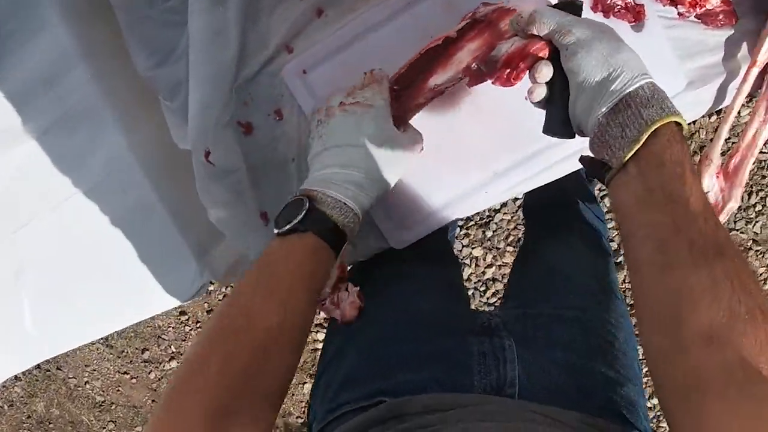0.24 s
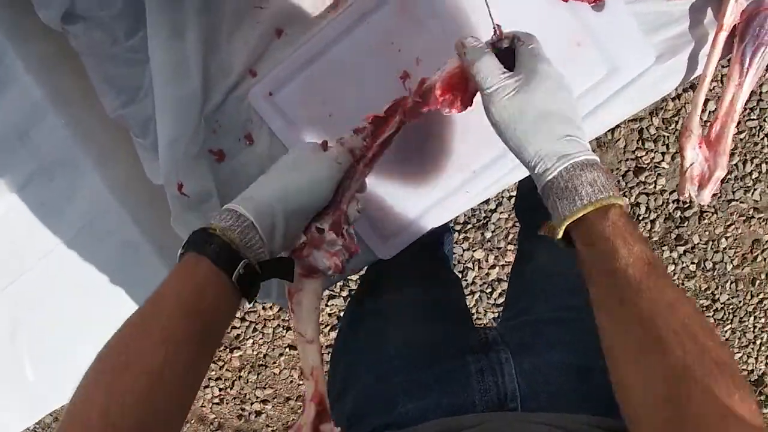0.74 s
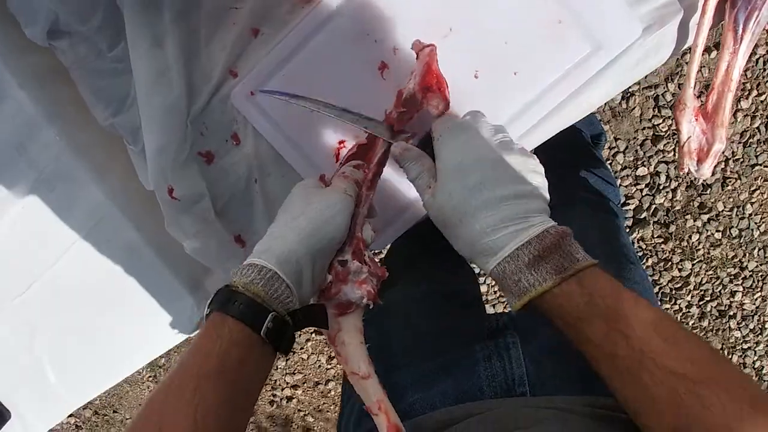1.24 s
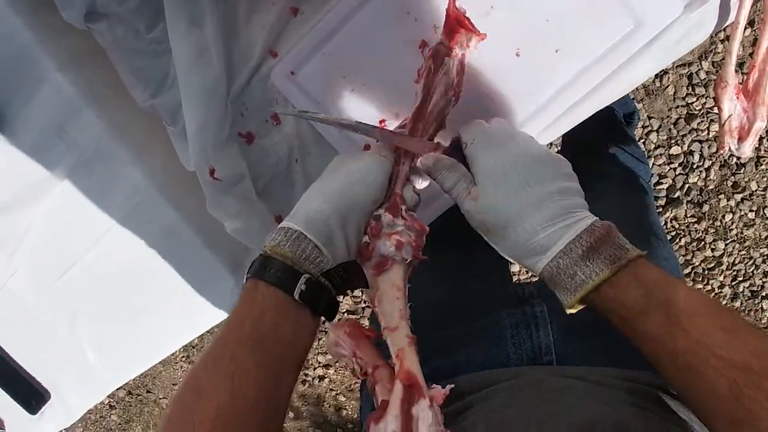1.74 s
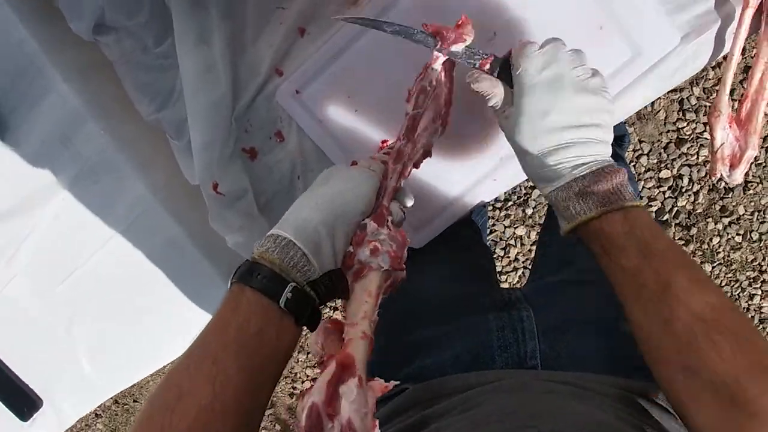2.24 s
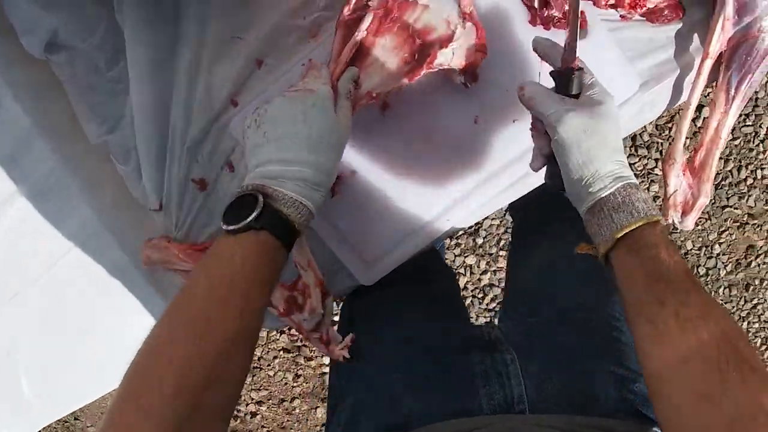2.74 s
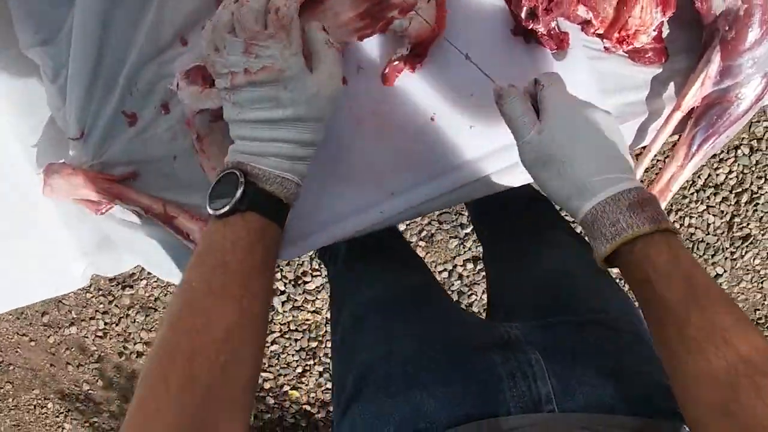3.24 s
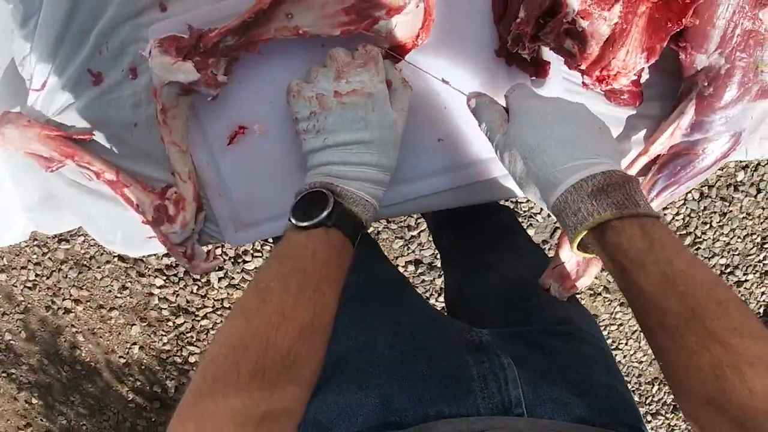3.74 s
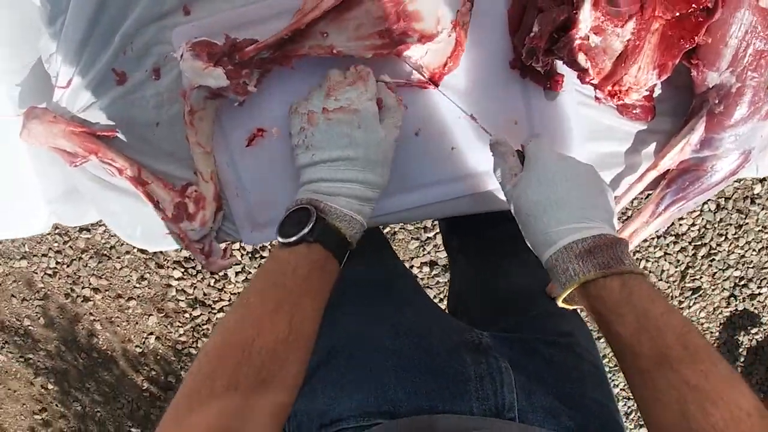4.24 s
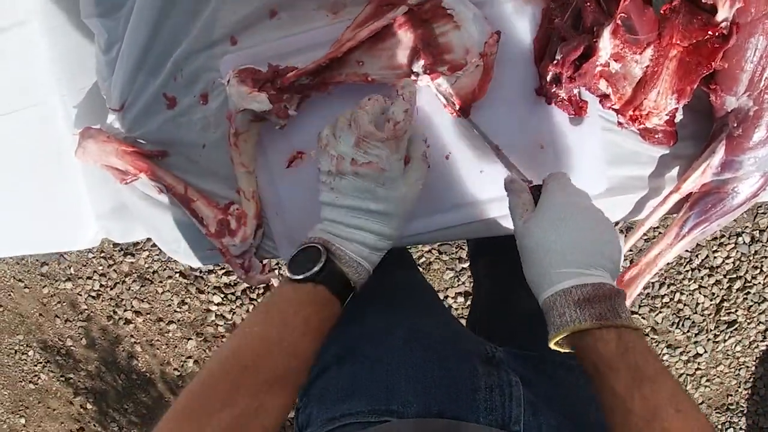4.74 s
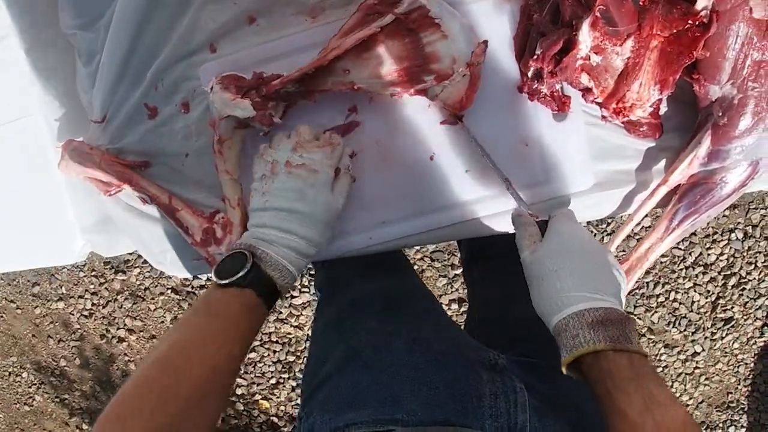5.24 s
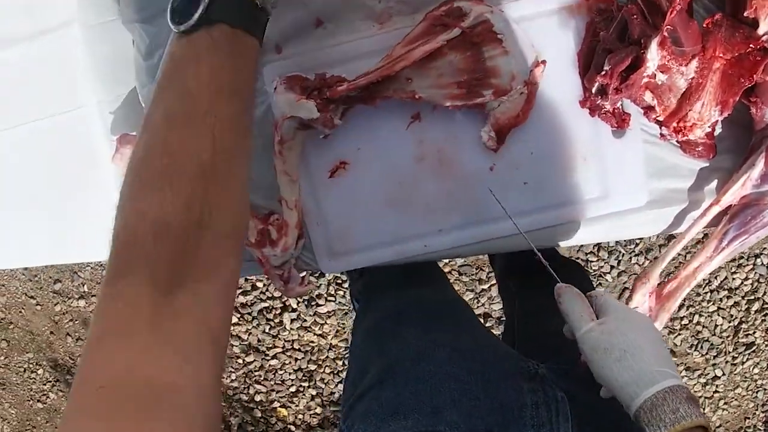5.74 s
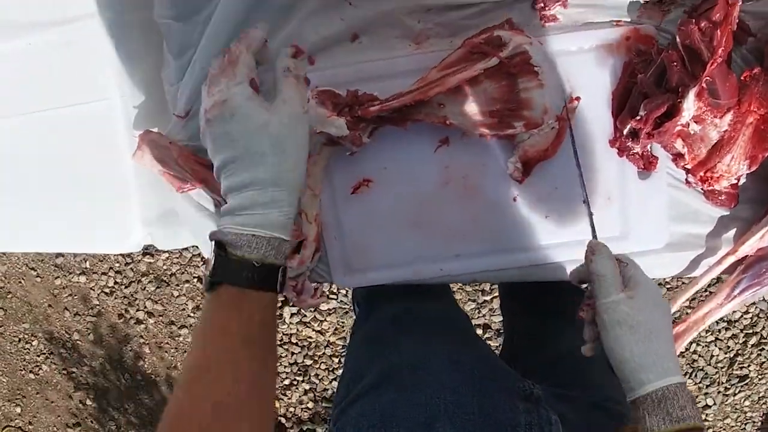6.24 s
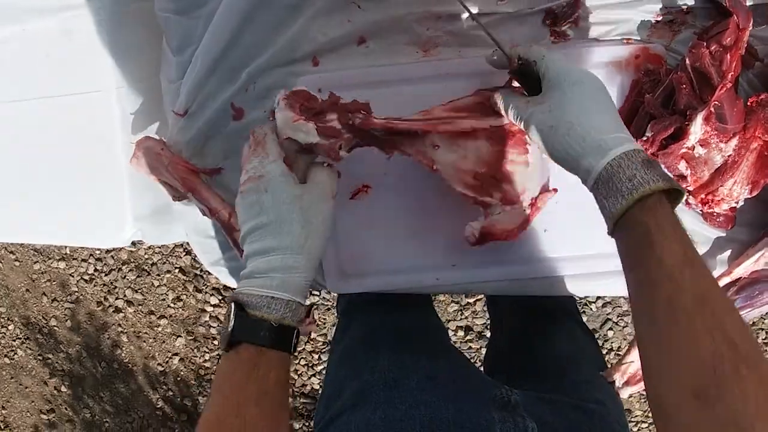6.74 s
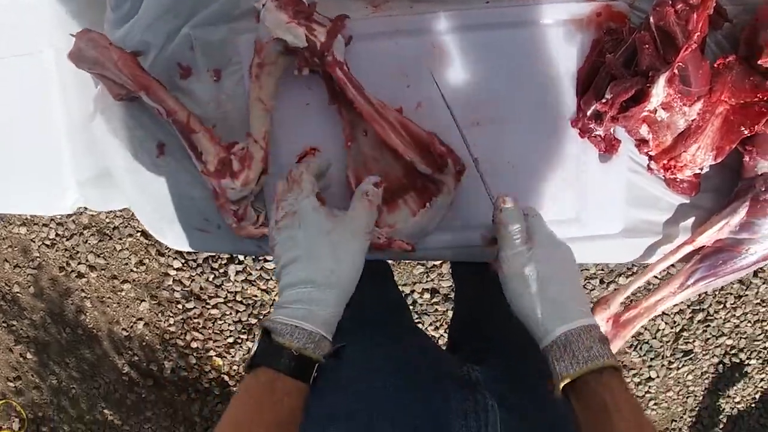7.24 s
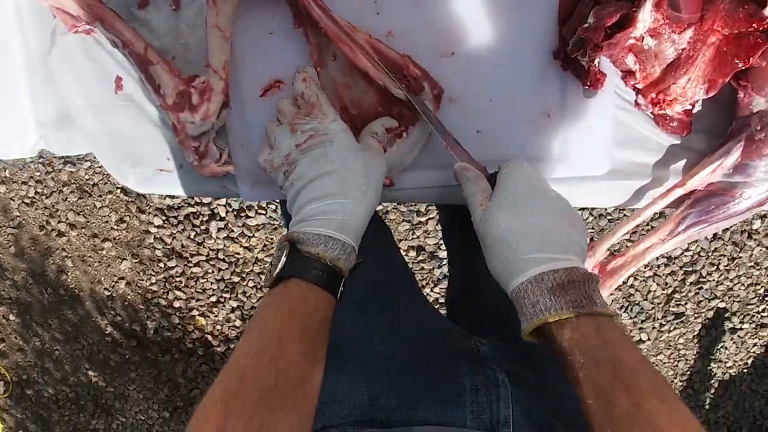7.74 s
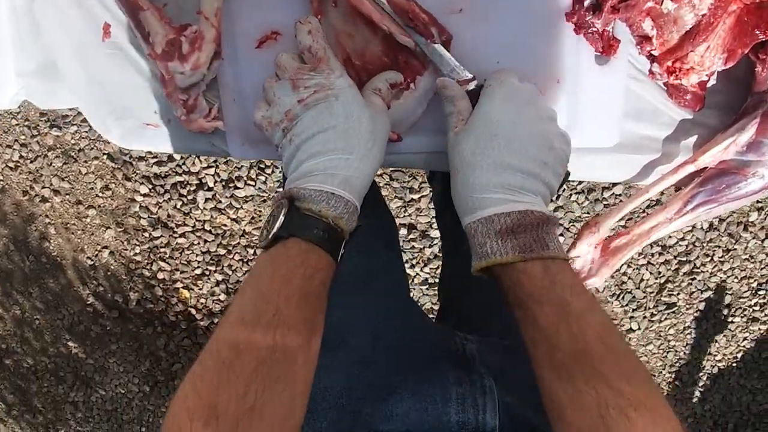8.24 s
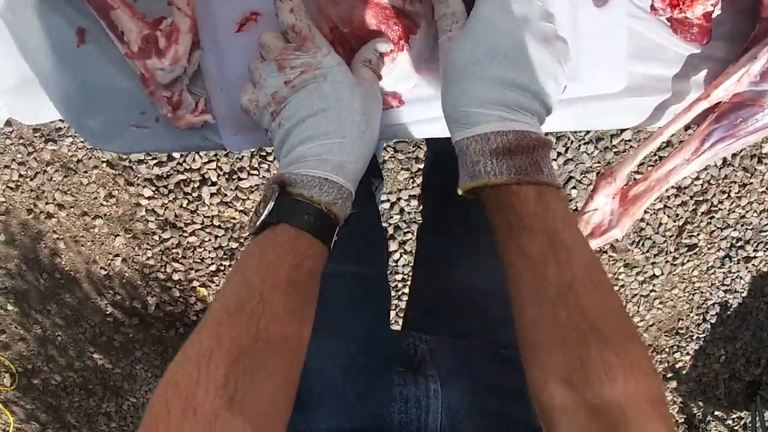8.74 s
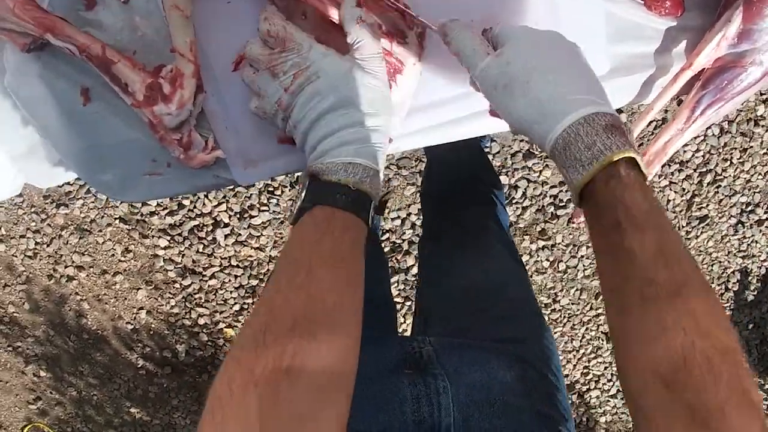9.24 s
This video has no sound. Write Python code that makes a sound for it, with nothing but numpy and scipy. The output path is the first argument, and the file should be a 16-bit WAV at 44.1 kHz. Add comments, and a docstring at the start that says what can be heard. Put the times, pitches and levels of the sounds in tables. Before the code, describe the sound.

Dull, meat-damped thuds open the scene on a hollow plastic board, followed by sparse blade scratches and glove friction. Another bump comes before three seconds, and a soft low drone swells briefly. Tiny double ticks run on. Swishing leads to a strong thump at seven seconds, then ticks grow clearer, with a short squeak. The dry, close microphone catches low air puffs and quiet outdoor air.

```python
"""A leg bone thuds and clatters onto a plastic cutting board, on a cloth-covered table outdoors.
Landings ring the board's modes; knife taps are bursts of micro-contacts through resonances and filters.
Small paired ticks are snaps with a fizz; gloves and meat slide as gritty noise with tiny wet pops.
Narrow noise bands ring briefly; a low drone swells early on, and a separate short squeak comes near the end.
Behind it all lie open air and a faint low drone in filtered noise, with puffs on the microphone."""
import sys
import numpy as np
from scipy import signal
from scipy.fft import rfft, irfft
from scipy.io import wavfile

SR = 44100
rng = np.random.default_rng(int(sys.argv[2]) if len(sys.argv) > 2 else 0)


def to_wav(s):
    """Save 16-bit WAV."""
    ch = np.atleast_2d(s).T  # columns
    pcm = np.round(np.clip(ch, -1, 1) * 32767)  # PCM
    wavfile.write(sys.argv[1], SR, pcm.astype(np.int16))


N = 419118
TIME = np.arange(N) / SR  # s
AGE = TIME[:SR // 3]  # s since a contact began


def from_db(db):
    """Turn a level in dB into an amplitude."""
    return 10 ** (np.asarray(db) / 20)


def rms_one(x):
    """Scale a steady sound to rms 1."""
    return x / np.sqrt(np.mean(x ** 2) + 1e-20)


def burst_one(x):
    """Scale a burst to the energy of 10 ms at rms 1."""
    return x / np.sqrt(np.sum(x ** 2) / (SR / 100) + 1e-20)


def dying(t60):
    """Exponential decay that falls 60 dB in t60 seconds."""
    return from_db(-60 * AGE / max(t60, 1e-3))


def bell(centre_s, length_s):
    """A smooth swell in level, down to 1/e at half its length on either side of the centre."""
    return np.exp(-(2 * (TIME - centre_s) / length_s) ** 2)


def add(out, s, sound):
    """Mix a sound in at a time in seconds."""
    start = max(round(s * SR), 0)
    out[start:start + len(sound)] += sound[:N - start]


def low_pass(x, hz, order=2):
    """Soften everything above a cut-off."""
    return signal.sosfilt(signal.butter(order, min(hz, SR / 3), fs=SR, output="sos"), x)


def resonance(x, hz, width_hz):
    """One broad or narrow peak, gain about 1 on top."""
    r = np.exp(-np.pi * width_hz / SR)
    feed = np.array([1, 0, -1]) * (1 - r * r) / 2
    feedback = [1, -2 * r * np.cos(2 * np.pi * hz / SR), r * r]
    return signal.lfilter(feed, feedback, x)


def colour(x, spectrum, size=4096):
    """Causal (minimum-phase) filter with the given spectrum; white noise keeps its power."""
    hz, db = np.transpose(spectrum)
    grid = np.log(np.maximum(np.fft.rfftfreq(size, 1 / SR), 1))
    # beyond either end of the table the level falls by 12 dB per octave
    outside = np.maximum(np.log(hz[0]) - grid, 0) + np.maximum(grid - np.log(hz[-1]), 0)
    log_gain = np.log(from_db(np.interp(grid, np.log(hz), db))) - 2 * outside
    # folding the cepstrum forward gives the minimum phase
    cepstrum = irfft(log_gain)
    cepstrum[1:size // 2] *= 2
    cepstrum[size // 2 + 1:] = 0
    response = irfft(np.exp(rfft(cepstrum)))
    return signal.oaconvolve(x, response / np.linalg.norm(response))[:len(x)]


def drift(rate):
    """Chance wandering: random knots of spread 1, so many per second, joined by straight lines."""
    knots = rng.standard_normal(N // 20)
    return np.interp(TIME * rate, np.arange(len(knots)), knots)


def grit(size, spread_db):
    """Countless tiny slips of uneven strength."""
    strength = from_db(spread_db * np.minimum(rng.exponential(1, size), 4))
    return rms_one(rng.standard_normal(size) * strength)


def contact(t60, tail_db, tail_t60, spread_db, rise_s=0.00043):
    """A short crunch of micro-contacts with a faint after-ring."""
    press = 1 - np.exp(-AGE / max(rise_s, 1e-5))
    decay = dying(t60) + from_db(tail_db) * dying(tail_t60)
    return burst_one(grit(len(AGE), spread_db) * press * decay)


def knocks(place_db=6.5, board_db=-9.5, loose_db=-10.5, bone_db=-25.0, low_cut_hz=50, meat_loss=0.032):
    """Each landing sets the board ringing; flesh softens the blow, bare bone chatters and rings."""
    # Bone and meat landing on the board. Each row: start in seconds, blow in dB, contact cut-off in Hz,
    # place on the board 0-1, ring time factor, clatter in dB.
    landings = [(.001, -6, 215, 0.3, 0.23, -29), (.039, 2, 306, 0.53, 0.19, -27),
                (.049, -7, 240, 0.15, 1.48, -23), (.063, -19.5, 200, 0.55, 1.3, -27),
                (2.782, -11, 485, 0.18, 0.81, -37), (2.798, -16, 377, .36, 1, -29.5),
                (2.884, -3.5, 125, 0.55, 0.78, -41), (4.12, -33.5, 150, 0.2, 0.74, -69),
                (5.039, -18.5, 140, 0.57, 0.54, -60), (7.009, -4.5, 382, .76, 0.84, -20),
                (7.025, -13.5, 420, 0.42, 0.86, -31.5), (7.053, -14.5, 303, 0.57, 1.84, -48),
                (7.083, 1.5, 314, 0.2, 0.44, -17), (7.785, -41, 400, .5, 0.99, -50),
                (7.822, -30, 240, 0.28, 0.62, -45), (8.128, -41, 237, 0.56, 1.8, -50),
                (8.545, -37, 151, 0.56, 1.1, -73), (8.745, -22, 240, 0.2, 1.15, -39),
                (8.842, -38, 250, 0.35, 0.6, -49.5)]
    # Board and table top. Each row: mode in Hz, relative level in dB, t60 in seconds of the board
    # before the ring time factor and the loss to the meat.
    board_modes = [(63, 0.5, 0.088), (78, -11.5, 0.31), (96.5, -1, 0.23), (131.5, 0.5, 0.23),
                   (158.5, 1.5, 0.35), (177, 8, 0.13), (221, -11.5, 0.39), (277, 0.5, 0.096),
                   (327.4, -7, 0.39), (356, -1, 0.14), (412.8, 3.5, 0.077), (538, 0.5, 0.13),
                   (618, -19, 0.17), (690, -13, 0.17), (769, -14.5, 0.41), (810, 3.5, 0.12),
                   (858, -6, 0.57), (1010, -4.5, 0.086)]
    # Hard bone chattering on the plastic. Each row: frequency in Hz, relative level in dB per Hz.
    clatter_colour = [(250, -7.5), (500, 7.5), (850, 8.5), (1150, -4), (1450, 5), (1950, 0), (2500, -9),
                      (4000, -12.5), (6500, -15), (9000, -36.5), (14000, -68.5)]
    # Ringing of the bare bone and blade. Each row: frequency in Hz, relative level in dB, t60 in seconds.
    bone_modes = [(1007, -1, .25), (1380, -6, 0.46), (1350, -5, 0.38), (1745, 0, 0.17), (1900, -7, 0.21),
                  (2050, -5.5, 0.11), (2260, -4.5, 0.26)]

    thuds, chatter, rings = np.zeros(N), np.zeros(N), np.zeros(N)
    hz, mode_db, t60 = np.transpose(board_modes)
    k = np.arange(len(board_modes))
    swing = np.sin(2 * np.pi * np.outer(hz, AGE))
    bone = sum(from_db(db) * np.sin(2 * np.pi * f * AGE) * dying(t) for f, db, t in bone_modes)
    for s, db, contact_hz, place, ring_time, clatter_db in landings:
        # each mode is strongest at its own places; neighbours swing against each other
        strength = (-1) ** k * from_db(board_db + mode_db + place_db * np.cos(np.pi * (k + 1) * place))
        # meat lying on the board takes a share of every cycle, so high modes lose more to it
        decay_per_s = np.log(1000) / (t60 * ring_time) + meat_loss * hz
        ring = strength @ (swing * np.exp(-np.outer(decay_per_s, AGE)))
        # loose flesh slaps down around the bone
        loose = burst_one(resonance(contact(0.13, -19.0, 0.4, 1.8), 300, 400))
        add(thuds, s, from_db(db) * low_pass(ring + from_db(loose_db) * loose, contact_hz))
        add(chatter, s, from_db(clatter_db) * contact(0.082, -27.5, 0.15, 3.6))
        add(rings, s, from_db(clatter_db + bone_db) * bone)
    high_pass = signal.butter(2, low_cut_hz, "high", fs=SR, output="sos")
    thuds = signal.sosfilt(high_pass, thuds + 1e-18)
    return thuds + rings + colour(chatter, clatter_colour)


def taps(body_width=0.41, skirt_width=1.0, crack_db=-4.5, rise_s=0.00082, top_hz=7500):
    """The touched spot answers with a resonance and a broad crack, the edge snicks, the handle tocks."""
    # Knife taps, and the low bodies of some landings. Each row: start in seconds, body in dB,
    # body pitch in Hz, steel edge in dB, t60 in seconds of the crunch at the touched spot.
    touches = [(0.039, -21, 446, -47, 0.018), (0.168, -59, 3000, -53, 0.017), (0.315, -55, 3500, -59, .018),
               (0.611, -46.5, 2550, -51.5, 0.018), (0.664, -44, 3040, -54, 0.011),
               (0.744, -63, 2860, -49, 0.027), (0.747, -46.5, 2240, -37.5, 0.027),
               (1.061, -58, 3000, -72, .012), (1.437, -45.5, 1940, -49.5, .04),
               (1.546, -45, 1660, -49, 0.03), (1.916, -30.5, 1100, -36, .031),
               (1.938, -37, 1190, -38.5, 0.087), (2.178, -60, 2230, -65, 0.0095),
               (2.265, -43.5, 1400, -46, 0.014), (2.386, -51.5, 3920, -78, 0.01),
               (2.631, -61, 3620, -54, 0.018), (2.783, -26.5, 457, -59, 0.13),
               (3.146, -39, 1520, -48, 0.046), (3.175, -48.5, 2090, -50, 0.037),
               (3.205, -43.5, 3250, -62, 0.02), (4.04, -51.5, 1180, -59.5, 0.077),
               (4.12, -45.5, 1000, -64, 0.027), (4.353, -51.5, 1340, -73, 0.063),
               (4.522, -55, 1400, -80, 0.032), (4.778, -45, 2980, -55, 0.016),
               (5.424, -48, 840, -77, 0.036), (5.61, -48.5, 1240, -58, 0.11), (5.819, -57, 2820, -56, .017),
               (5.993, -56, 2300, -47.5, 0.018), (6.38, -68, 3500, -56.5, 0.016),
               (6.439, -40.5, 2960, -48, 0.018), (6.689, -48.5, 3080, -68, 0.013),
               (6.721, -47, 1290, -65, 0.014), (7.056, -32.5, 400, -26.5, .023),
               (7.082, -17.5, 1650, -55, 0.018), (7.555, -53, 1306, -88, .019),
               (7.776, -53.5, 1490, -64, 0.01), (7.788, -42, 1520, -74, 0.015),
               (7.82, -38, 1450, -76, .0083), (8.127, -47.5, 1040, -47.5, 0.015),
               (8.687, -47.5, 2750, -49, .021), (8.725, -42, 820, -54, 0.024),
               (8.743, -32.5, 3500, -31, 0.018), (8.757, -36.5, 2000, -56, 0.018),
               (8.922, -54.5, 2560, -52, .02), (8.956, -55, 1700, -55, 0.014)]
    # Colour of the steel edge. Each row: frequency in Hz, relative level in dB per Hz.
    edge_colour = [(2000, -10.5), (3500, 0.5), (5000, 5.5), (6700, 9), (8200, 2.5), (9200, -5.5),
                   (11000, -11.5), (15000, -33)]
    # the tock relative to the body of a 1 kHz tap, and its loss as the touch gets higher and lighter
    tock_db, tock_loss_db_per_octave = -4.5, 5.5

    body, edge = np.zeros(N), np.zeros(N)
    for s, body_db, body_hz, edge_db, t60 in [*touches, *stray_touches()]:
        handle_db = body_db + tock_db - tock_loss_db_per_octave * np.log2(body_hz / 1000)
        crunch = contact(t60, -32.5, 0.074, 4.2, rise_s)
        spot = resonance(crunch, body_hz, body_hz * body_width)
        spot = resonance(spot, body_hz, body_hz * skirt_width)
        crack = resonance(contact(t60, -29.5, 0.11, 4.6, rise_s), 2800, 1800)
        add(body, s, from_db(body_db) * burst_one(spot))
        # the crack needs both a firm touch and a bare edge
        add(body, s, from_db((body_db + edge_db) / 2 + crack_db) * burst_one(crack))
        handle = low_pass(resonance(contact(t60 * 0.68, -19.0, 0.16, 3.6, rise_s), 350, 450), 950)
        add(body, s, from_db(handle_db) * burst_one(handle))
        add(edge, s, from_db(edge_db) * contact(t60 * 1.1, -33.0, 0.25, 8.9, rise_s))
    return low_pass(body, top_hz) + colour(edge, edge_colour)


def stray_touches(count=12):
    """Light touches at random moments, as rows like those of the taps."""
    middle_db, spread_db, edge_db = -63, 3.5, -6  # the edge is relative to the body
    low_hz, high_hz, t60_s = 1300, 3930, 0.048
    when, pitch, force = rng.random((count, 3)).T
    db = middle_db + spread_db * (2 * force - 1)
    hz = low_hz * (high_hz / low_hz) ** pitch
    return list(zip(when * N / SR, db, hz, db + edge_db, np.full(count, t60_s)))


def sliding(drag_db=-1.0, swish_db=-4.5, reach_octaves=1.0, judder_db=3.0,
            crackle_db=-8.0, crackle_limit_db=-45.5):
    """Friction excites resonances near the pitch of the stroke; glove swish and wet crackle lie on top."""
    # Resonances that the drag excites. Each row: frequency in Hz, width in Hz, relative level in dB.
    drag_modes = [(420, 460, 5), (620, 460, 4.5), (820, 510, 2), (1108, 640, 0.5), (1450, 330, -0.5),
                  (1720, 270, -5), (2040, 1100, -1.5), (2940, 790, 1)]
    # Colour of the swish. Each row: frequency in Hz, relative level in dB per Hz.
    swish_colour = [(1800, -7), (3200, -0.5), (4800, -1.5), (6600, -2), (8000, -11.5), (9200, -17),
                    (11000, -22), (13000, -34), (15500, -45.5)]

    drag_level, drag_hz, swish_level = rubbing()
    slips, octave = [grit(N, 6.2), grit(N, 5.8)], np.log2(drag_hz)
    drag, power = np.zeros(N), 1e-9
    for k, (hz, width_hz, db) in enumerate(drag_modes):
        weight = from_db(db) * np.exp(-((np.log2(hz) - octave) / reach_octaves) ** 2 / 2)
        drag += weight * rms_one(resonance(resonance(slips[k % 2], hz, width_hz), hz, hz))
        power = power + weight ** 2
    drag *= from_db(drag_level + drag_db) / np.sqrt(power)
    swish = from_db(swish_level + swish_db) * colour(grit(N, 1.2), swish_colour)
    # pops stay small however fast the meat slides
    wet_level = np.minimum(swish_level, crackle_limit_db) + crackle_db
    wet = from_db(wet_level) * crackles(51, 1680, 6130, 0.18)
    return (drag + swish) * from_db(judder_db * drift(90)) + wet


def rubbing():
    """Holding and strokes add in power, which weighs their pitches; gives drag dB, drag Hz, swish dB."""
    # Gloves holding the meat and rubbing lightly. Each row: time in seconds, drag in dB before
    # the trim in sliding().
    holding = [(0, -54), (1.0, -61.5), (1.25, -67.5), (2.4, -62.5), (3.5, -68), (4.2, -63), (5.55, -65.5),
               (5.7, -60), (6.15, -67.5), (6.6, -59.5), (7.6, -73.5), (8.0, -64.5), (8.35, -59.5),
               (9.0, -59.5), (9.5, -68)]
    # Strokes of knife, gloves and meat. Each row: start in seconds, length in seconds, drag in dB,
    # drag centre in Hz, bright swish in dB; both levels before the trims in sliding().
    strokes = [(0.028, 0.095, -41.5, 1000, -54), (0.231, 0.61, -61.5, 1150, -57.5),
               (0.805, .2, -61, 825, -67), (1.33, 0.043, -54.5, 920, -67), (1.422, 0.03, -47, 1520, -47),
               (1.876, 0.063, -57, 1340, -58), (1.939, 0.021, -48, 1110, -55),
               (2.108, 0.043, -56, 690, -77), (2.269, 0.019, -45.5, 930, -52),
               (2.71, 0.091, -46.5, 925, -44.5), (2.749, 0.079, -55, 570, -32), (2.788, .13, -44, 650, -47),
               (2.954, 0.18, -51, 1250, -53), (3.113, .18, -62, 1500, -56),
               (4.074, 0.077, -53.5, 1750, -51.5), (4.372, 0.063, -64, 2500, -55.5),
               (4.68, .1, -62, 1450, -56.5), (4.79, .1, -54, 1700, -55.5), (5.017, 0.027, -57, 620, -54.5),
               (5.143, 0.23, -63, 890, -62.5), (5.41, 0.039, -56, 800, -62), (5.6, 0.096, -62, 1200, -56.5),
               (5.914, 0.098, -57, 1340, -55.5), (6.425, 0.038, -56, 1300, -51),
               (6.589, 0.14, -55.5, 2000, -47.5), (6.721, 0.087, -43, 2100, -39),
               (6.8, 0.096, -52, 2230, -45), (6.86, 0.12, -46.5, 2100, -42), (6.975, 0.13, -36.5, 850, -35),
               (7.085, 0.21, -56.5, 907, -64), (8.225, 0.078, -54, 1980, -57),
               (8.39, 0.092, -48.5, 930, -53), (8.523, 0.14, -53.5, 1860, -47),
               (8.676, 0.13, -51.5, 1000, -63), (8.935, 0.048, -48.5, 1270, -50),
               (9.091, 0.053, -56, 1300, -75)]
    holding_hz, holding_swish_db = 1000, -1.5  # swish relative to the drag
    # a stroke presses in over a share of its length, eases off by some dB to its end, and dies away
    attack_share, ease_db, release_t60_s = 0.56, 4, 0.14

    drag = from_db(np.interp(TIME, *np.transpose(holding))) ** 2
    swish = drag * from_db(holding_swish_db) ** 2
    log_hz = drag * np.log(holding_hz)
    for s, length, drag_db, hz, swish_db in strokes:
        age = np.arange(int((length + release_t60_s) * SR)) / SR
        attack = np.sin(np.pi / 2 * np.minimum(age / (attack_share * length), 1))
        ease = from_db(ease_db * (.5 - np.minimum(age / length, 1)))
        release = np.exp(-np.log(1000) * np.maximum(age - length, 0) / release_t60_s)
        press = attack * ease * release
        power = (from_db(drag_db) * press) ** 2
        add(drag, s, power)
        add(log_hz, s, power * np.log(hz))
        add(swish, s, (from_db(swish_db) * press) ** 2)
    return 10 * np.log10(drag), np.exp(log_hz / drag), 10 * np.log10(swish)


def crackles(per_s, low_hz, high_hz, width, count=10):
    """Wet tissue parts in tiny pops, each dealt one of a few pitches and given a soft top."""
    happens = rng.random(N) < per_s / SR
    sign = rng.choice([-1, 1], N)
    pops = happens * sign * from_db(4 * np.minimum(rng.exponential(1, N), 2.5))
    dealt = rng.integers(0, count, N)
    rings = np.zeros(N)
    for k, hz in enumerate(np.geomspace(low_hz, high_hz, count)):
        rings += resonance(pops * (dealt == k) + 1e-18, hz, hz * width) / np.sqrt(hz)
    return rms_one(low_pass(rings, 7000, order=4))


def ticks(pair_gap=.022, repeat_gap=0.0018, snap_db=-9.0, fizz_db=-3.0, second_db=0.1):
    """Small ticks in pairs, 22 ms apart; each is a snap, repeated once at once, with a brief fizz."""
    # Ticks that come in pairs. Each row: start of the first tick in seconds, level in dB
    # that snap and fizz are set against.
    pairs = [(0.147, -72), (1.661, -64.5), (3.418, -61.5), (3.575, -55.5), (3.744, -52.5), (3.912, -54),
             (4.087, -52.5), (4.233, -52), (4.566, -55), (4.702, -51), (5.147, -57), (5.296, -56),
             (5.45, -57), (7.252, -61), (7.446, -56.5), (7.629, -58.5), (7.855, -51), (8.069, -48.5),
             (8.269, -41.5), (8.467, -43), (8.817, -39.5), (9.092, -34.5), (9.288, -37)]
    # Colour of the ticks. Each row: frequency in Hz, relative level in dB per Hz.
    tick_colour = [(1000, -20.5), (2200, -10.5), (3800, -3.5), (5800, 0), (6800, -0.5), (8300, -10),
                   (9300, -14), (12000, -25.5), (15000, -38)]

    out = np.zeros(N)
    snap = from_db(snap_db) * burst_one(np.ones(1))
    for s, first_db in pairs:
        for at, db in ((s, first_db), (s + pair_gap, first_db + second_db)):
            add(out, at, from_db(db) * snap)
            add(out, at + repeat_gap, from_db(db) * snap)
            add(out, at, from_db(db + fizz_db) * contact(0.034, -13.5, 0.16, 1.5))
    return colour(out, tick_colour)


def narrow_bands():
    """Gritty noise swells briefly through one resonance at a time."""
    # Narrow bands of noise: brief ringing tones, and one bright click at 8.75 s. Each row:
    # centre in seconds, length in seconds, pitch in Hz, width in Hz of the narrower filter, level in dB.
    bands = [(7.112, 0.071, 6300, 700, -58), (7.198, 0.2, 1317, 160, -69.5), (7.781, 0.024, 1480, 252, -53),
             (7.892, 0.05, 1450, 202, -59.5), (8.62, 0.077, 1490, 220, -54.5),
             (8.746, 0.0053, 11000, 2500, -36.5)]

    out, noise = np.zeros(N), grit(N, 2.5)
    for s, length, hz, width_hz, db in bands:
        tone = rms_one(resonance(resonance(noise, hz, width_hz), hz, width_hz * 3))
        out += from_db(db) * tone * bell(s, length)
    return out


def swell_and_squeak(overtone_db=-32.0, waver_per_s=70):
    """Soft tones whose pitch dips slightly or clearly as their level falls."""
    # A swell of the drone and a short squeak of rubbed flesh. Each row: centre in seconds,
    # length in seconds, pitch in Hz, share of pitch lost at the ends, level in dB, pitch waver share.
    tones = [(3.333, 1.27, 170.6, 0.00481, -57, 0.0077), (8.284, 0.063, 305, 0.36, -45, 0.065)]

    out = np.zeros(N)
    for s, length, hz, bend, db, waver in tones:
        swell = bell(s, length)
        pitch = hz * (1 - bend * (1 - swell) ** 2 + waver * drift(waver_per_s))
        phase = 2 * np.pi * np.cumsum(pitch) / SR
        wave = np.sin(phase) + from_db(overtone_db) * np.sin(2 * phase)
        out += from_db(db) * np.sqrt(2) * swell * wave
    return out


def outdoors(air_db=-57):
    """Still air, a wavering drone of narrow noise bands, and low puffs on the microphone."""
    # Open air. Each row: frequency in Hz, relative level in dB per Hz.
    air_colour = [(15, -51), (25, 10), (71, -1.5), (118, -1), (167, 4.5), (335, -14.5), (404, -12.5),
                  (655, -20), (769, -11.5), (952, -27), (1310, -18), (2070, -38.5), (6370, -29),
                  (10000, -44.5), (15000, -83.5)]
    # Distant drone. Each row: frequency in Hz, half the width of each filter in Hz, level in dB.
    drone_bands = [(78.4, 4.8, -62.5), (160, 7.1, -67.5), (189.5, 34, -65.5)]
    # Puffs of air on the microphone. Each row: centre in seconds, length in seconds, level in dB.
    puffs = [(1.031, 0.032, -44), (1.522, 0.066, -47), (1.856, 0.045, -50), (1.998, 0.076, -43),
             (4.556, 0.064, -42), (4.824, 0.08, -46.5), (5.055, 0.042, -36), (6.584, 0.21, -48.5),
             (6.76, 0.071, -43.5), (6.998, 0.018, -33.5), (8.74, 0.081, -37)]

    out = from_db(air_db) * rms_one(colour(rng.standard_normal(N), air_colour))
    for hz, width_hz, db in drone_bands:
        band = resonance(rng.standard_normal(N), hz, width_hz * 2)
        out += from_db(db) * rms_one(resonance(band, hz, width_hz * 2))
    gusts = sum(from_db(db) * bell(s, length) for s, length, db in puffs)
    rumble = rms_one(low_pass(resonance(rng.standard_normal(N), 16.0, 67), 67))
    return out + gusts * rumble


def scene():
    """All the layers at the table and around it, in one channel."""
    handling = knocks() + narrow_bands() + taps() + ticks() + sliding()
    return (handling + swell_and_squeak() + outdoors())[None]


def record(dry):
    """The loudest peaks are rounded and the top is cut."""
    rounded = 1.09 * np.tanh(dry / 1.106)
    top_cut = signal.ellip(10, .1, 80, 15500, fs=SR, output="sos")  # ripple dB, stop dB, edge Hz
    return signal.sosfilt(top_cut, rounded)


dry = scene()
out = record(dry)
to_wav(out)
```